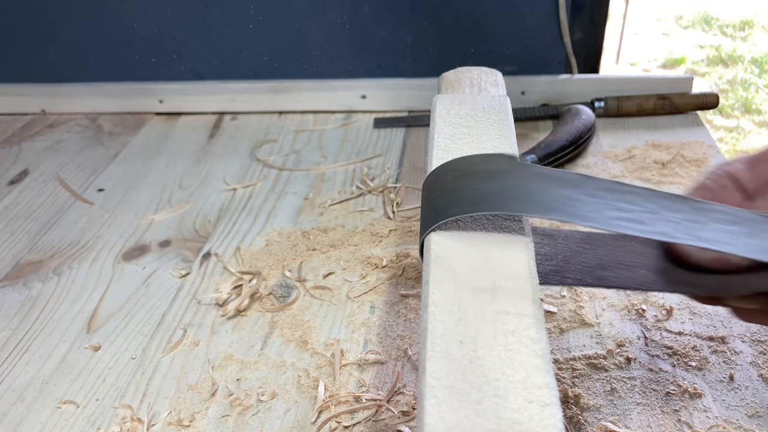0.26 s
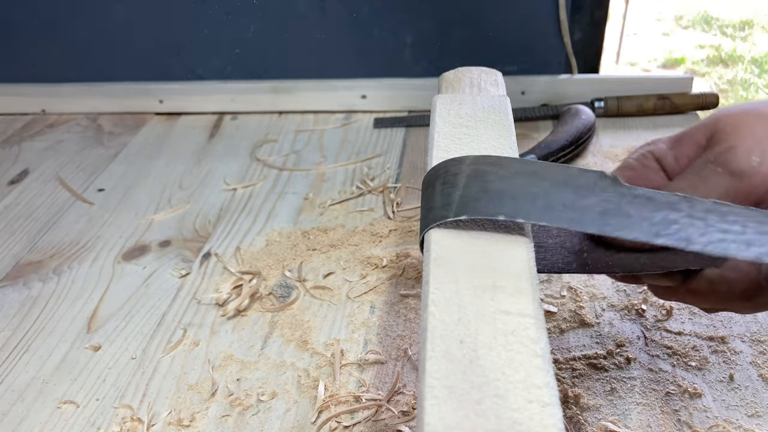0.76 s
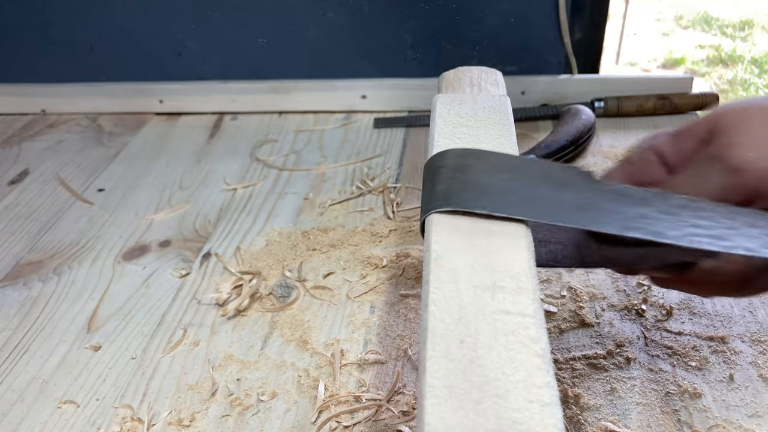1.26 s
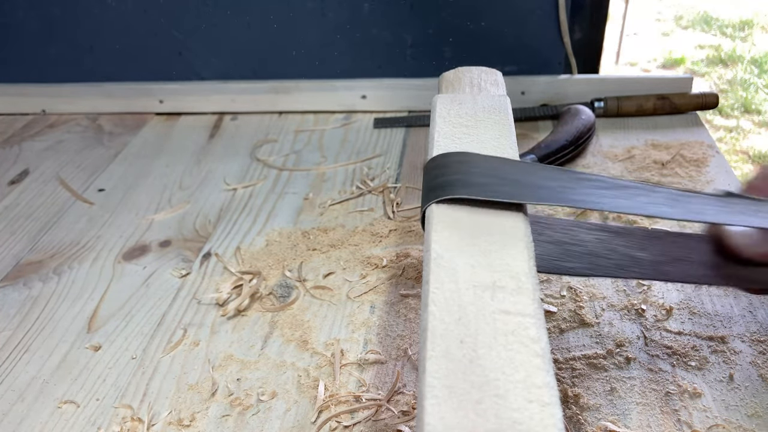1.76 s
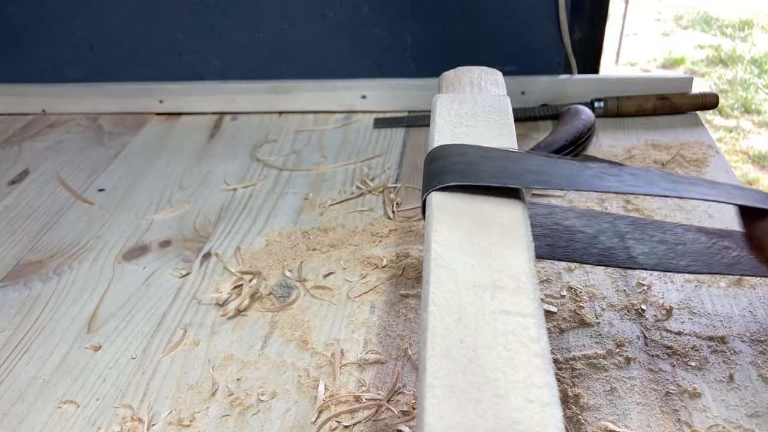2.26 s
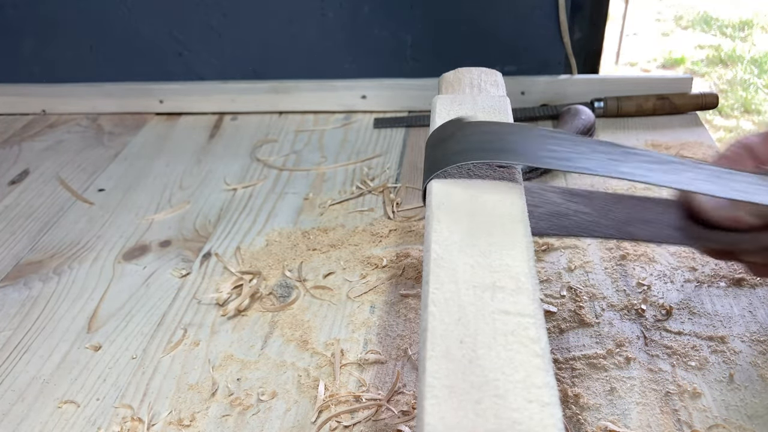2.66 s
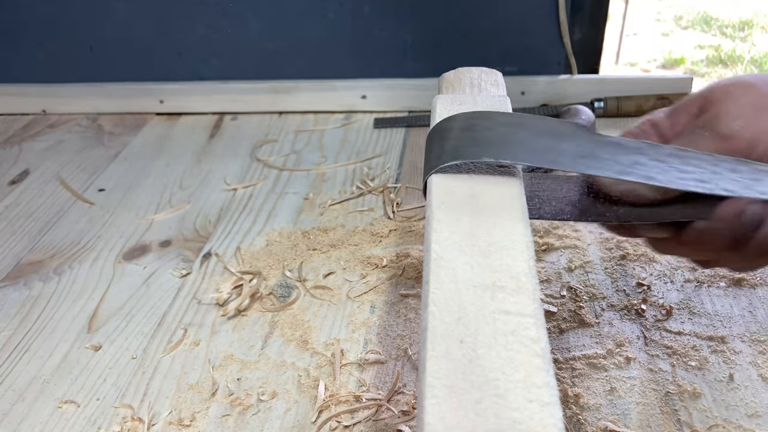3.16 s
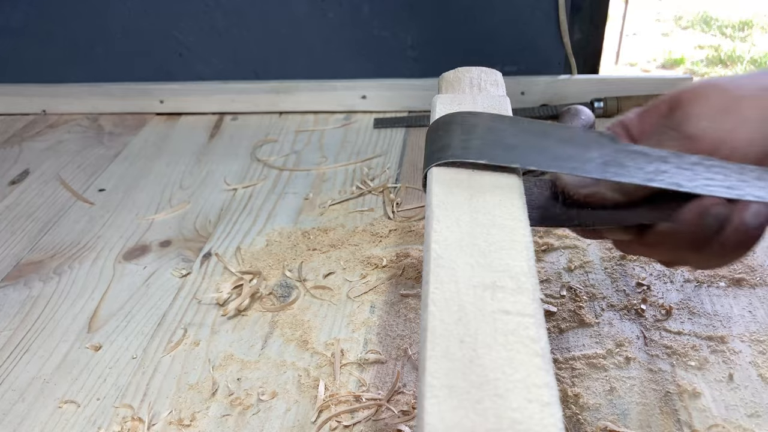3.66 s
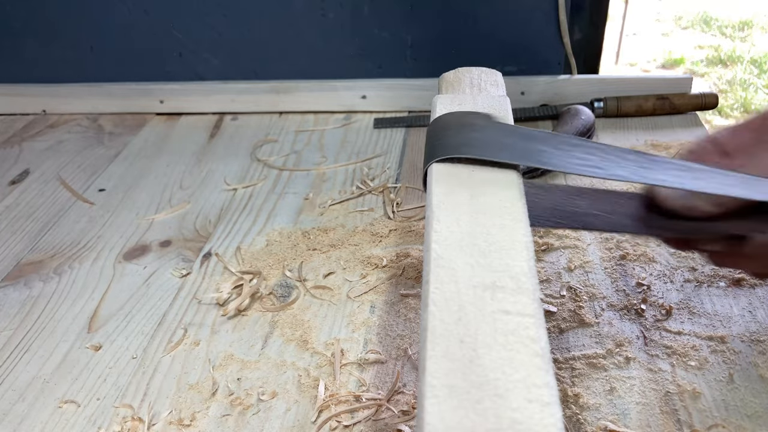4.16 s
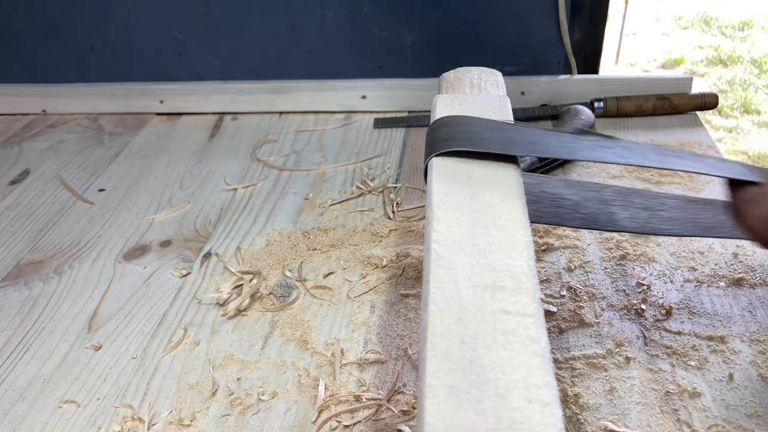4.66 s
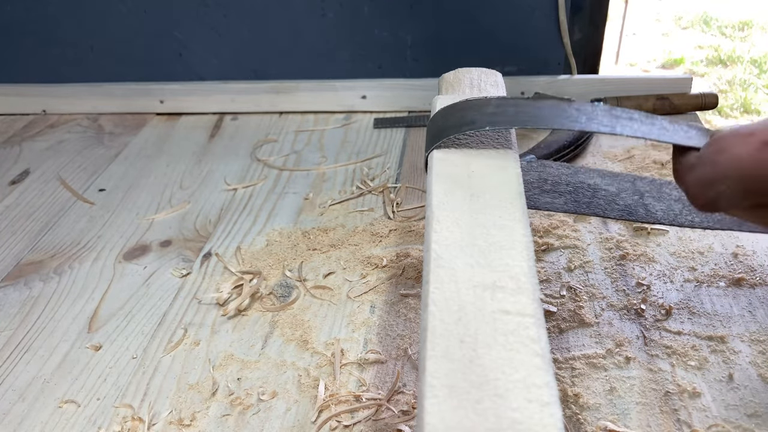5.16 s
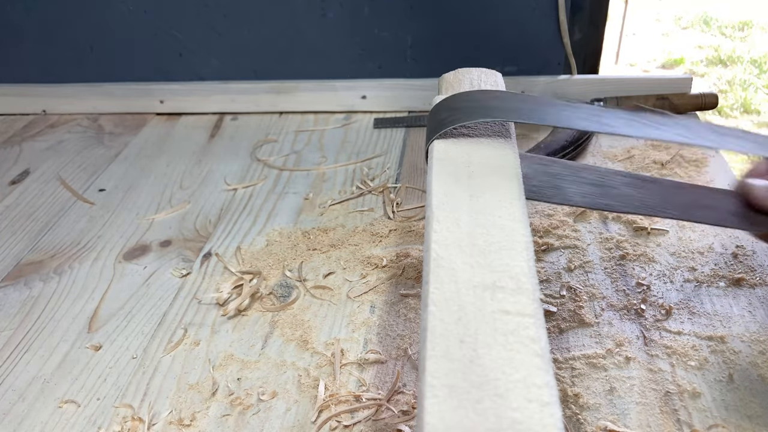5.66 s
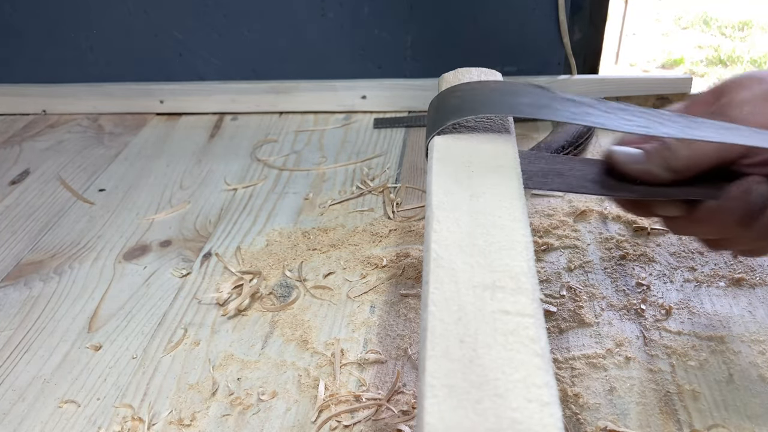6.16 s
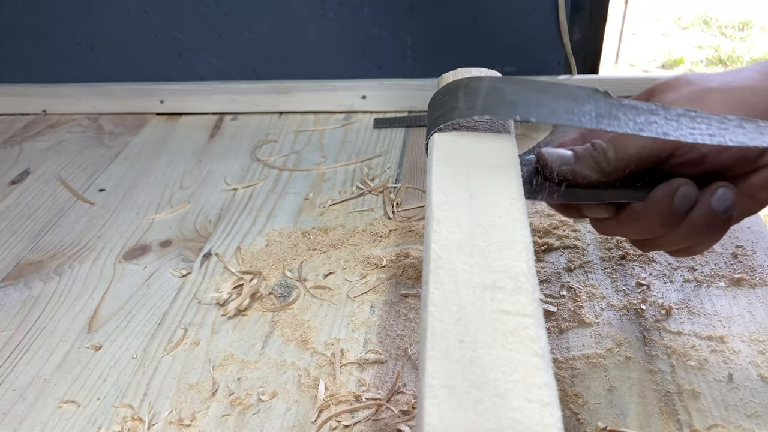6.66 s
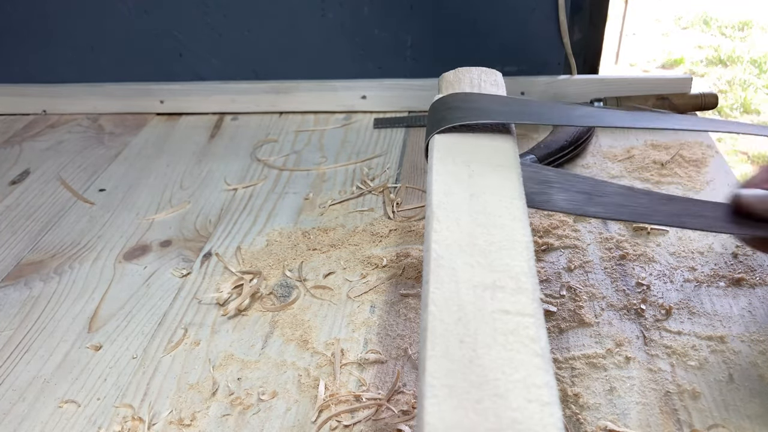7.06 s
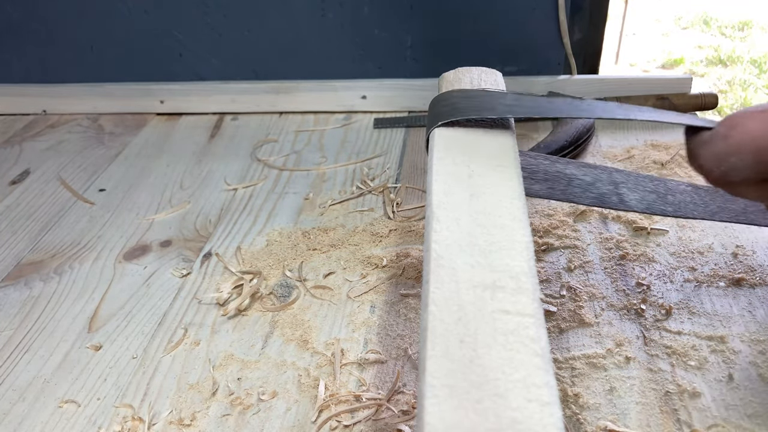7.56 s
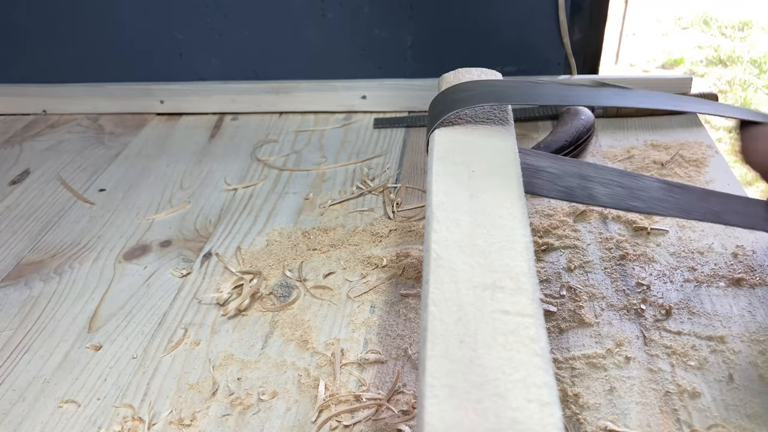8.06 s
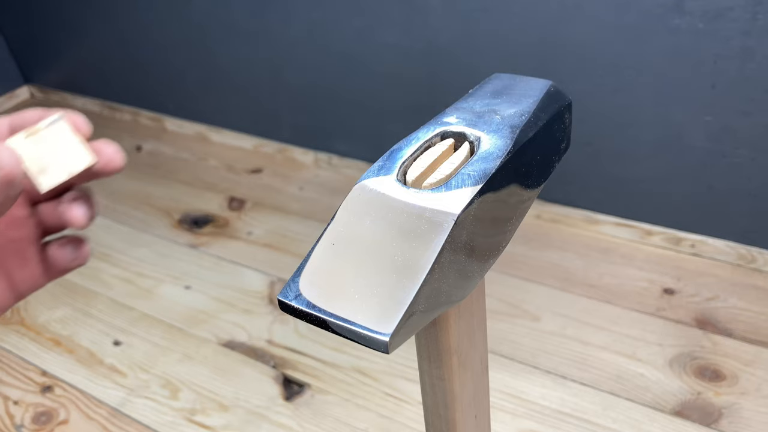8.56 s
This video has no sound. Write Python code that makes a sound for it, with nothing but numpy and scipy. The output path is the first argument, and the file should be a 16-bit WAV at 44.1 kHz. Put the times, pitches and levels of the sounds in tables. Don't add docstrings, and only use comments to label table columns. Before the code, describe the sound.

Fast, steady sanding of a clamped wooden bar, dry, gritty and hollow-toned, stops dead near the end, leaving faint room air and tiny bird chirps.

```python
import sys
import numpy as np
from scipy import signal
from scipy.fft import rfft, irfft, next_fast_len
from scipy.io import wavfile
from scipy.ndimage import uniform_filter1d, map_coordinates

SR = 44100
rng = np.random.default_rng(int(sys.argv[2]) if len(sys.argv) > 2 else 0)


def voltage_ratio(decibels):
    exponent = np.asarray(decibels, float) / 20
    return 10 ** exponent


def dump_mix(stems):
    frames = np.atleast_2d(stems).T
    limited = np.clip(frames, -1, 1)
    pcm = np.round(limited * 32767).astype(np.int16)
    wavfile.write(sys.argv[1], SR, pcm)


N = 388074

# (start [s], end [s], speed [dB], pressure [dB])
STROKES = [(-0.07, 0.156, -1.1, -0.5), (0.2, 0.444, 1.5, -2.5), (0.486, 0.741, -1, -1.3),
           (0.775, 1.034, .5, -2.5), (1.071, 1.341, -0.9, -1.6), (1.37, 1.63, 0, -1.7),
           (1.671, 1.935, -0.9, -0.6), (1.97, 2.227, 0.3, -0.6), (2.265, 2.528, -1, -2.2),
           (2.562, 2.829, 0.6, -0.7), (2.864, 3.115, -0.9, -1.4), (3.143, 3.41, 0.7, -1.1),
           (3.442, 3.717, -1.6, -2.2), (3.745, 4, .8, -0.5), (4.036, 4.291, -.5, -2.5),
           (4.332, 4.6, 0.1, 0.5), (4.63, 4.9, -1, -1.7), (4.93, 5.19, 0.4, 0.7), (5.223, 5.488, -1, -0.6),
           (5.52, 5.775, 1.2, 1.7), (5.812, 6.083, -0.7, 0.9), (6.109, 6.377, 0.1, 1.5),
           (6.403, 6.66, .5, 0.4), (6.692, 6.966, .5, 0.8), (7.003, 7.261, -0.1, -0.4),
           (7.29, 7.553, 1, -1.2), (7.581, 7.858, -0.7, -1.4), (7.887, 8.216, 0, -1.9)]
# (time [s], place [0-1])
STRIP_PLACE = [(0, 0.01), (1.6, 0.19), (3.2, 0.4), (4.8, .585), (6.4, 0.82), (7.4, 0.92), (8.2, 0.84)]
SPEED_ARCH = [
    (0.046, .03, 1.43, 0.78),
    (0.015, 0.06, 1.116, 0.92),
]
# (shortfall at start [dB], shortfall at end [dB], time to grip or let go [share of stroke],
# gain from start to end [dB])
PRESSURE_GRIP = [
    (-3.5, -7.5, .06, 3.5),
    (-16, -7, .05, -4),
]
# (time [s], level [dB])
SNAGS = [(.307, 3.5), (.551, 2.5), (.878, 3.5), (1.032, 7), (1.225, 3), (1.413, 3), (1.616, 4),
         (2.003, 2.5), (2.322, 9), (2.47, 2.5), (2.612, 0.5), (3.01, 0), (3.26, -1), (3.642, 2.5),
         (4.396, 2), (4.659, 4.5), (5.47, -0.5), (5.835, 1), (7.489, 0.5), (8.075, 0.5)]
BITE_RISE = [
    .005,
    .008,
    .016,
    .018,
]
# (speed [power], pressure [power], decay at the turn [dB/s],
# rest level [dB], level [dB])
GROUP_RESPONSE = [
    (.02, 0.86, 918.5, -28, -24.5),
    (.75, 0.9, 509, -31.5, -22.5),
    (1.019, .05, 274, -28, -26.5),
    (1.079, .05, 264.5, -33, -31.5),
]

# (frequency [Hz], width [Hz], level [dB])
LOW_MODES = [(618.2, 42.4, -1.5), (665.5, 46.3, 2), (787, 63, -17.5), (807, 17, -47)]
DEEP_MODES = [(531, 24, -18.5)]
SHARP_MODES = [(817, 46, -2)]
VALLEY_MODES = [(1040, 30, -38.5), (1088, 150, -17), (1173, 33, -18), (1260, 410, -25)]
MID_A_MODES = [(1421, 210, -18.5), (1495, 99, -5.5), (1513, 50.5, -3.5), (1575, 27.3, -3),
               (1720.6, 38, -6.5), (1744.5, 40, -13.5)]
MID_B_MODES = [(1860, 100, -10), (1989.3, 78, -2), (2018.3, 45, 5), (2076, 110, -5.5), (2656, 41, -9),
               (2805, 51, -8), (2970, 110, -19.5)]
MID_C_MODES = [(2274, 87, -6.5), (2324, 88, -5), (2445, 43, -6)]
FEED = {"low": (0.85, 1.3, -7), "deep": (0.71, 4.6, -33.5), "sharp": (0.038, 7.3, -6),
        "valley": (0.65, -7, 30), "a": (0.5, -3.5, 38.6), "b": (.25, 1.5, -16), "c": (0.66, 3.74, -26)}
# (frequency [Hz], width [Hz], level [dB])
STRIP_MODES = [(3056, 25, 1.5), (3245, 77, -2), (3418, 98, -4), (3610, 75, 1), (3837, 76, 0.5),
               (3988, 51, 2.5), (4170, 41, 1.5), (4407, 120, -2), (4666, 51, 1), (4726, 80, -3),
               (4924, 330, -3.5), (5260, 170, -4), (5866, 310, -6), (6267, 170, -6), (6306, 150, -5.5)]
# (frequency [Hz], density [dB per Hz])
HISS_SPECTRUM = [(2940, -25.5), (5000, -8.5), (5470, -5), (5990, 0), (6710, -3), (10200, -7),
                 (14400, -19.5), (15500, -27.5)]

# (frequency [Hz], width [Hz], level [dB])
FRAME_MODES = [(38, 16, -4.5), (59.9, 14.4, 1), (127.4, 18, 1.4)]
# (frequency [Hz], width [Hz], level [dB])
BOARD_MODES = [(157.7, 14, 0), (216.6, 16, -4), (266, 22, -7), (342.6, 40, -14.5)]
# (time [s], level [dB])
LURCHES = [(.34, -32.5), (.7, -38.5), (.91, -38), (1.47, -38), (2.15, -39.5), (2.52, -39), (2.77, -41),
           (3.18, -40), (3.67, -35.5), (3.95, -40), (4.26, -33.5), (4.57, -35.5), (4.79, -39), (5.05, -39),
           (5.33, -40), (5.62, -37.5), (6.04, -38), (6.33, -36), (6.62, -36.5), (6.89, -36), (7.1, -41.5),
           (7.5, -38), (7.81, -39), (8.09, -42.5)]

# (frequency [Hz], density [dB per Hz])
AIR_SPECTRUM = [(15, -44.5), (25, -4), (75, 5), (125, -17), (213, -7), (293, -18), (501, -17.5), (573, -18),
                (2180, -27), (8550, -30), (11000, -33), (15000, -48.5)]
# (time [s], level [dB])
AIR_LEVEL = [(8.23, -59), (8.8, -58.5)]
# (time [s], level [dB])
RUSTLE_LEVEL = [
    (8.5, -97.5),
    (8.62, -72),
    (8.68, -63),
    (8.8, -75.5),
]
# (frequency [Hz], width [Hz], level [dB])
CLOTH_MODES = [(240, 91, -2.5), (370, 90, 3), (580, 120, -4.5), (1100, 120, -7.5)]
# (start [s], length [s], from [Hz], to [Hz], level [dB])
WHISTLES = [
    (8.172, .2, 4000, 3340, -70.5),
    (8.41, .032, 3800, 4300, -68),
    (8.49, .03, 6800, 6600, -78),
    (8.55, .035, 6600, 6800, -77),
]

THIN_MOMENTS = [.071, .234, .35, .675, .884, 1.302, 1.464, 2.068, 2.091, 2.231, 2.765, 3.299, 3.577, 3.902,
                3.926, 4.274, 4.343, 4.576, 5.969, 6.015, 6.271, 6.364, 6.596, 6.735, 6.828, 6.851, 7.385,
                7.432, 8.012, 8.778]
# (frequency [Hz], step over local rms [dB])
THIN_STEP = [(400, -20), (600, 1), (1200, 7), (2000, 6), (6000, 9), (7000, 15), (10500, 14.5), (11500, 22)]

SCENE_CHANGE_S = 8.152
SLACK_DB, SLACK_AT, SLACK_WIDTH = -1.5, 0.39, 0.049
BITE_LATE_S, SNAG_S = 0.0023, 0.012
FINE_HZ, FINE_POWER = 10500, 0.15
LURCH_S, BENCH_REST_DB = 0.053, -45
BLOCK, BLOCK_START = 1024, 64


def unit(x):
    return x / np.sqrt(np.mean(x ** 2) + 1e-20)


def along(points, hz):
    f, v = np.transpose(points)
    return np.interp(np.log(hz + 1), np.log(f + 1), v)


def curves(rows):
    s, *cols = np.transpose(rows)
    return [np.interp(np.arange(N) / SR, s, c) for c in cols]


def wobble(rate):
    return map_coordinates(rng.standard_normal(int(N * rate / SR) + 4), [np.arange(N) * rate / SR])


def filtered(x, response):
    m = next_fast_len(N + SR // 2)
    return irfft(rfft(x, m) * response(np.fft.rfftfreq(m, 1 / SR)), m)[..., :N]


def modes(table):
    def response(f):
        total = 0
        for k, (centre, width, db) in enumerate(table):
            resonance = 1j * f * width / (centre * centre - f * f + 1j * f * width)
            total = total + (-1) ** k * voltage_ratio(db) * resonance
        return total
    return response


def patchy(x, depth_db, span=8):
    z = signal.stft(x, nperseg=512)[2]
    field = uniform_filter1d(rng.standard_normal(z.shape), 3, 0)
    field = uniform_filter1d(field, span, 1)
    return signal.istft(z * voltage_ratio(depth_db * unit(field)), nperseg=512)[1][:N]


def effort():
    t = np.arange(N) / SR
    start, end, stroke_speed_db, stroke_press_db = np.transpose(STROKES)
    k = np.clip(np.searchsorted(start, t) - 1, 0, None)
    u = np.clip((t - start[k]) / (end - start)[k], 0, 1)
    lead, lag, late, power = np.transpose(SPEED_ARCH)[:, k % 2]
    grip_db, release_db, quick, gain_db = np.transpose(PRESSURE_GRIP)[:, k % 2]

    arch = np.sin(np.pi * (lead + (1 - lead - lag) * u ** late)).clip(1e-3)
    speed_db = stroke_speed_db[k] + power * 20 * np.log10(arch)

    press_db = stroke_press_db[k] + gain_db * (u - 0.5)
    press_db = press_db + grip_db * np.exp(-u / quick) + release_db * np.exp((u - 1) / quick)
    press_db = press_db + SLACK_DB * np.exp(-((u - SLACK_AT) / SLACK_WIDTH) ** 2)
    press_db = press_db + sum(db / (1 + ((t - s) / SNAG_S) ** 2) for s, db in SNAGS)

    turn = np.clip(t - end[k], 0, None)
    gains = []
    for rise_s, (fast, hard, fall, rest_db, db) in zip(BITE_RISE, GROUP_RESPONSE):
        bite = np.clip((t - start[k] - BITE_LATE_S) / rise_s, 0, 1)
        drive = voltage_ratio(fast * speed_db + hard * press_db - fall * turn)
        gains.append(voltage_ratio(db) * (bite * drive + voltage_ratio(rest_db)))
    return gains


def grit(rough_db, patch_db):
    clumps = unit(voltage_ratio(rough_db * wobble(400)) * rng.standard_normal(N))
    quick_patches = patchy(clumps, patch_db)
    return patchy(quick_patches, 0.8 * patch_db, span=24)


def handle_modes():
    place, = curves(STRIP_PLACE)
    feed = {name: voltage_ratio(db + bend_db * (place - at) ** 2) for name, (at, db, bend_db) in FEED.items()}
    top = grit(rough_db=1.5, patch_db=1.35)
    side = grit(rough_db=1.75, patch_db=1.5)

    low = filtered(top * feed["low"], modes(LOW_MODES))
    low = low + filtered(side * feed["deep"], modes(DEEP_MODES))
    sharp = filtered(side * feed["sharp"], modes(SHARP_MODES))
    low = low + filtered(sharp, modes(SHARP_MODES))
    low = low + filtered(top * feed["valley"], modes(VALLEY_MODES))

    mid = filtered(top * feed["b"], modes(MID_B_MODES))
    mid = mid + filtered(side * feed["a"], modes(MID_A_MODES))
    mid = mid + filtered(side * feed["c"], modes(MID_C_MODES))
    return low, mid


def grit_hiss(hiss_gain):
    air = grit(rough_db=-0.3, patch_db=1.95)
    hiss = filtered(air, lambda hz: voltage_ratio(along(HISS_SPECTRUM, hz)))
    fine = filtered(hiss, lambda hz: 1 / (1 + (FINE_HZ / (hz + 1)) ** 6))
    return hiss + fine * ((hiss_gain / hiss_gain.max()) ** FINE_POWER * 1.17 - 1)


def strip():
    gains = effort()
    low, mid = handle_modes()
    upper = filtered(grit(rough_db=-2.0, patch_db=2.0), modes(STRIP_MODES))
    hiss = grit_hiss(gains[-1])
    total = sum(gain * unit(part) for gain, part in zip(gains, [low, mid, upper, hiss]))
    return voltage_ratio(0.56 * wobble(30)) * total


def thin_bar(hz):
    s = 1j * hz / 470
    return s ** 2 / (1 + 1.1 * s + s ** 2)


def bench():
    frame_force, board_force = rng.standard_normal((2, N))
    t = np.arange(N) / SR
    lurches = sum(voltage_ratio(db) / (1 + ((t - s) / LURCH_S) ** 2) for s, db in LURCHES)
    shake = voltage_ratio(BENCH_REST_DB) + 0.49 * lurches
    swell = unit(effort()[1] ** 0.2)
    frame = filtered(frame_force, lambda hz: modes(FRAME_MODES)(hz) ** 2)
    boards = filtered(swell * board_force, modes(BOARD_MODES))
    return shake * unit(frame + boards)


def quiet_shop():
    air = patchy(rng.standard_normal(N), depth_db=1.2)
    air = unit(filtered(air, lambda hz: voltage_ratio(along(AIR_SPECTRUM, hz))))
    rustle = unit(filtered(rng.standard_normal(N), modes(CLOTH_MODES)))
    return voltage_ratio(curves(AIR_LEVEL)[0]) * air + voltage_ratio(curves(RUSTLE_LEVEL)[0]) * rustle


def bird():
    out = np.zeros(N)
    for s, length, from_hz, to_hz, db in WHISTLES:
        u = np.linspace(0, 1, round(length * SR))
        pitch = to_hz + (from_hz - to_hz) * (1 - u) ** 5 + rng.normal(0, 550, len(u))
        swell = np.sqrt(np.sin(np.pi * np.sqrt(u)).clip(0))
        tone = np.sin(2 * np.pi * np.cumsum(pitch) / SR)
        out[round(s * SR):][:len(u)] += voltage_ratio(db) * swell * tone
    return out * voltage_ratio(3.5 * wobble(60))


def scene():
    sanding = filtered(strip(), lambda hz: thin_bar(hz) ** 2) + bench()
    before = np.clip((SCENE_CHANGE_S - np.arange(N) / SR) / 0.0016, 0, 1)
    return (before * sanding + quiet_shop() + bird())[None]


def thinned(x):
    window = np.sin(np.pi * (np.arange(2 * BLOCK) + 0.5) / BLOCK / 2)
    line, sample = np.arange(BLOCK) + 0.5, np.arange(2 * BLOCK) + 0.5 + BLOCK / 2
    basis = window * np.cos(np.pi / BLOCK * np.outer(line, sample))
    coarse_db = along(THIN_STEP, np.arange(BLOCK) * SR / 2 / BLOCK)
    out = np.pad(x[0], (0, BLOCK))
    for s in THIN_MOMENTS:
        at = BLOCK_START + BLOCK * (round((s * SR - BLOCK_START) / BLOCK) - 1)
        lines = basis @ out[at:at + 2 * BLOCK]
        band_db = np.repeat(rng.normal(0, 2, BLOCK // 16), 16)
        local_rms = np.sqrt(np.abs(uniform_filter1d(lines ** 2, size=40)) + 1e-20)
        step = voltage_ratio(coarse_db + band_db) * local_rms
        change = np.round(lines / step) * step - lines
        out[at:at + 2 * BLOCK] += 2 / BLOCK * change @ basis
    return out[None, :N]


def roll_off(x):
    return signal.sosfilt(signal.butter(12, 15670, fs=SR, output="sos"), x)


def record(dry):
    mix = thinned(dry)
    return roll_off(mix)


dry = scene()
out = record(dry)
dump_mix(out)
```